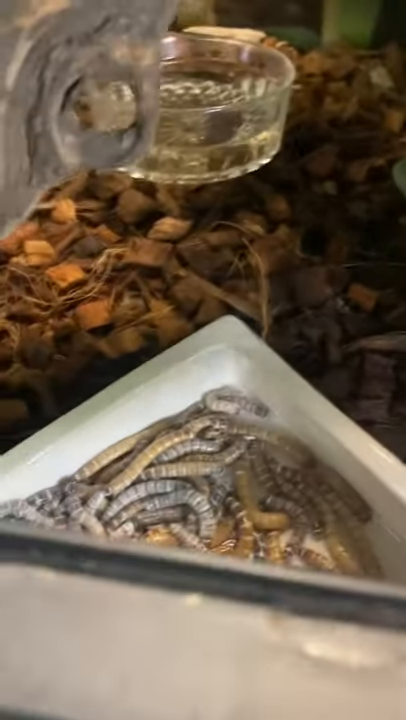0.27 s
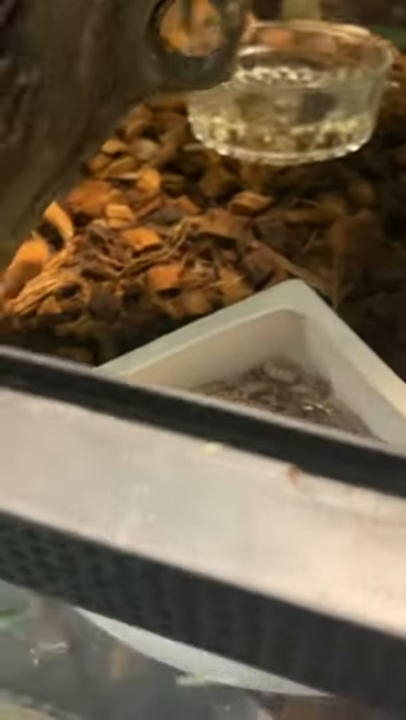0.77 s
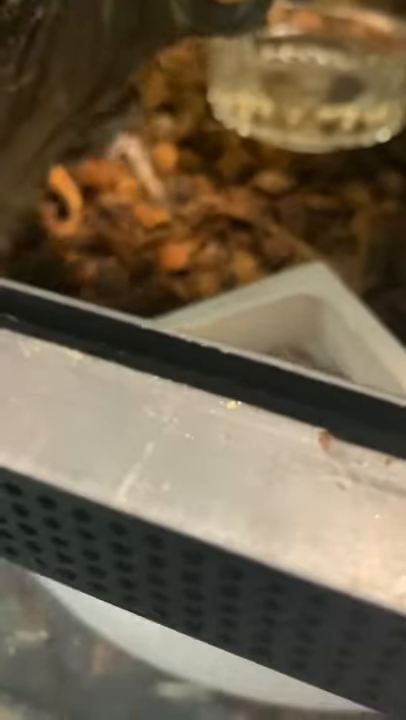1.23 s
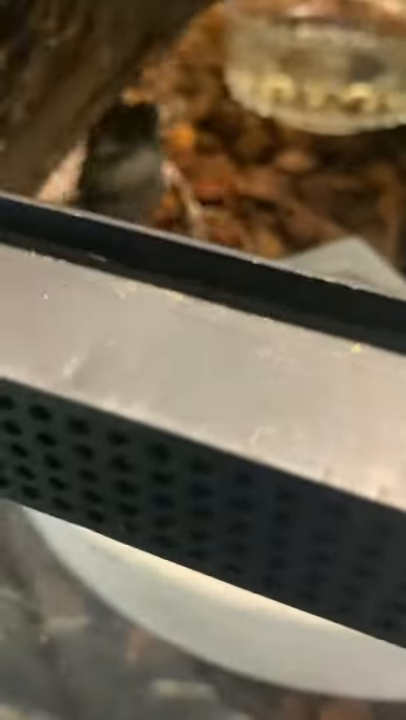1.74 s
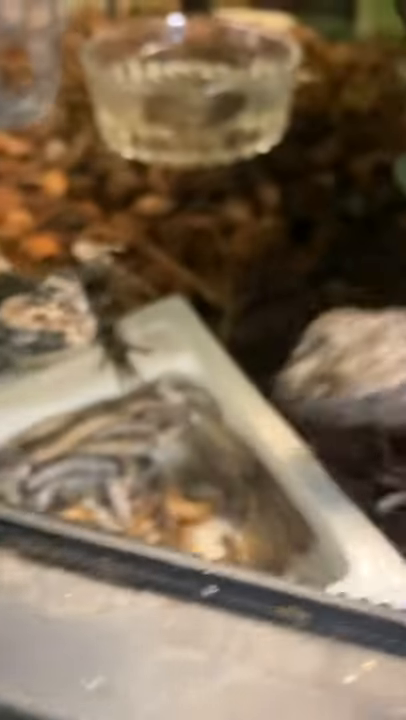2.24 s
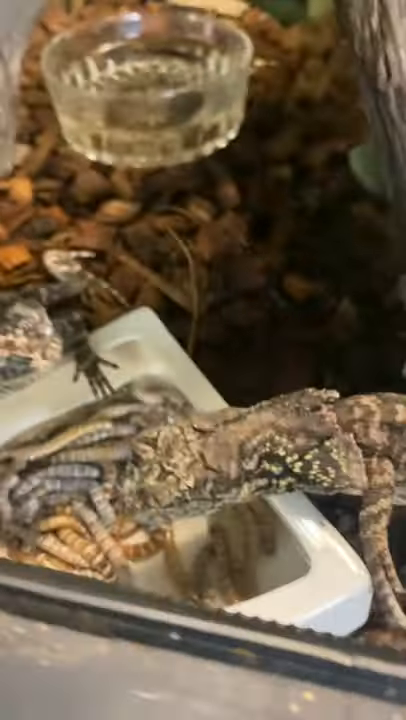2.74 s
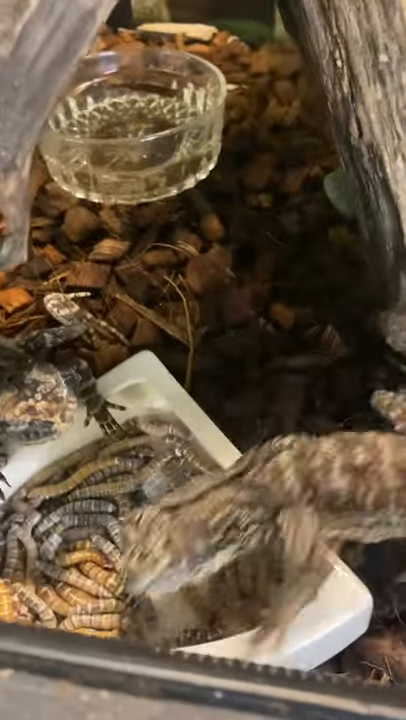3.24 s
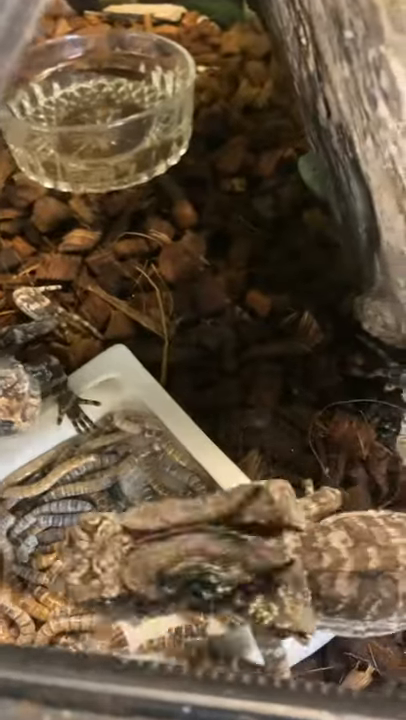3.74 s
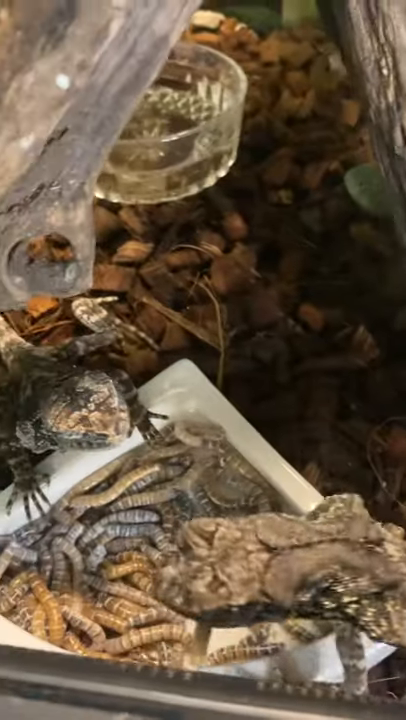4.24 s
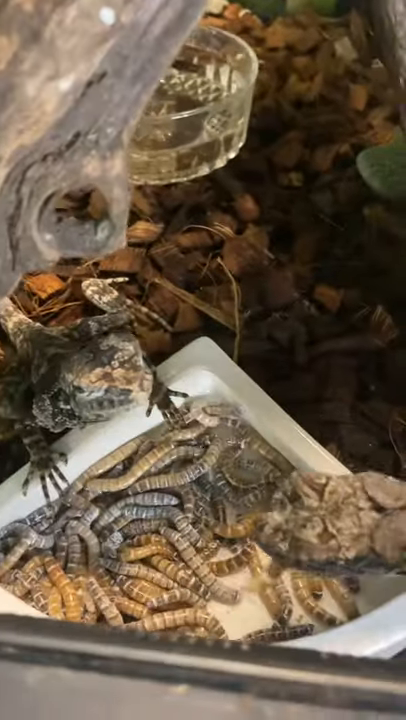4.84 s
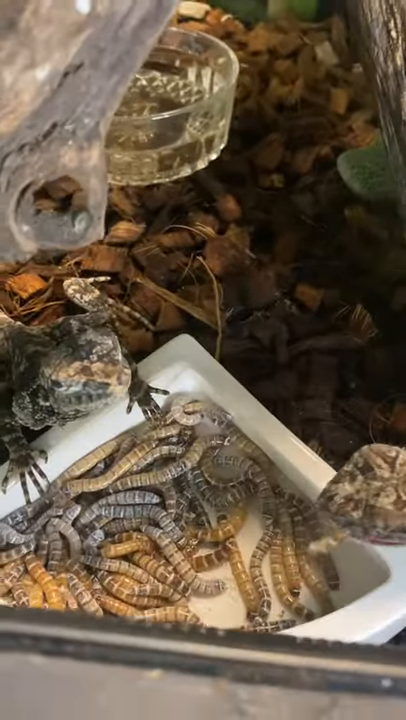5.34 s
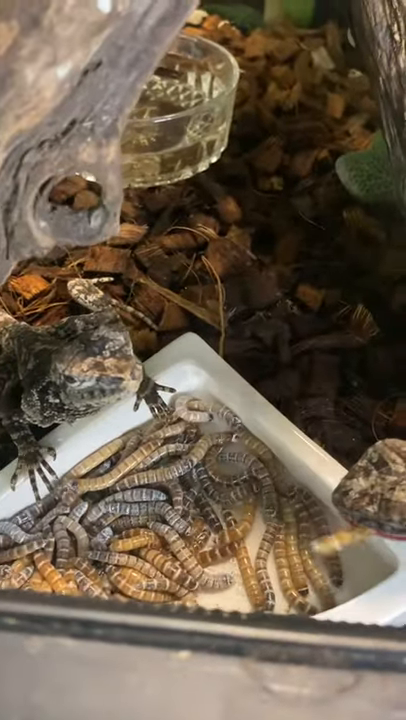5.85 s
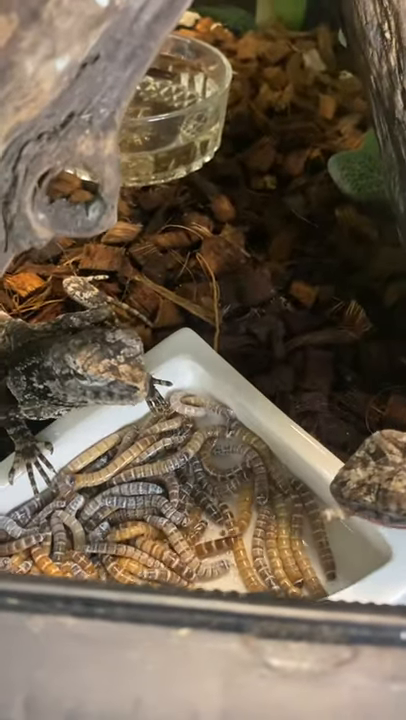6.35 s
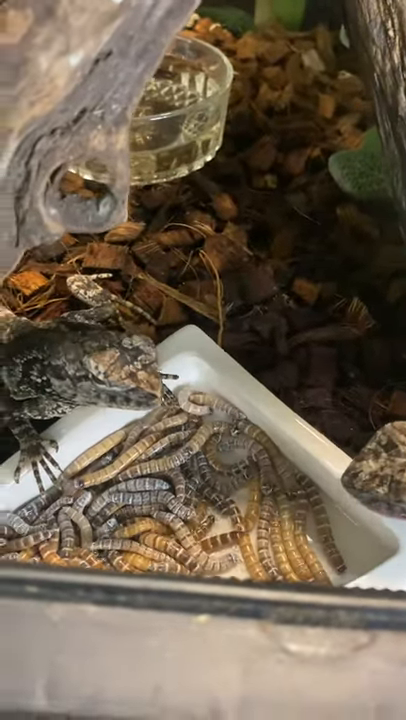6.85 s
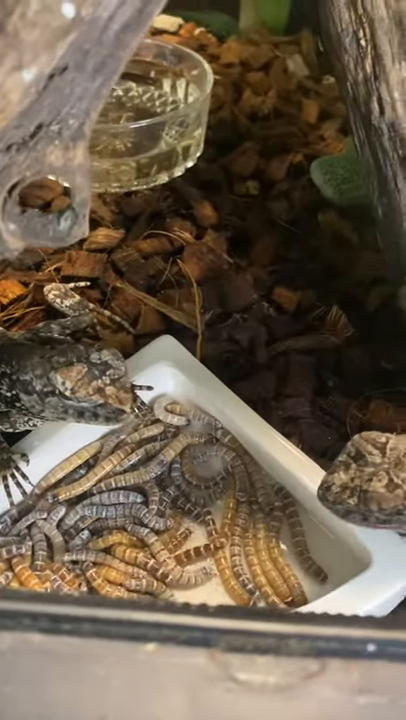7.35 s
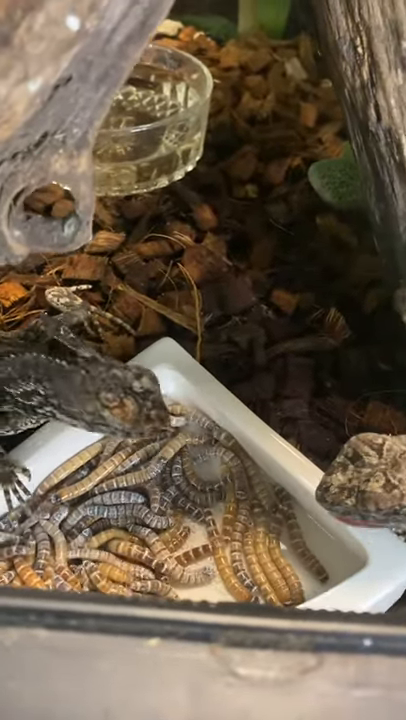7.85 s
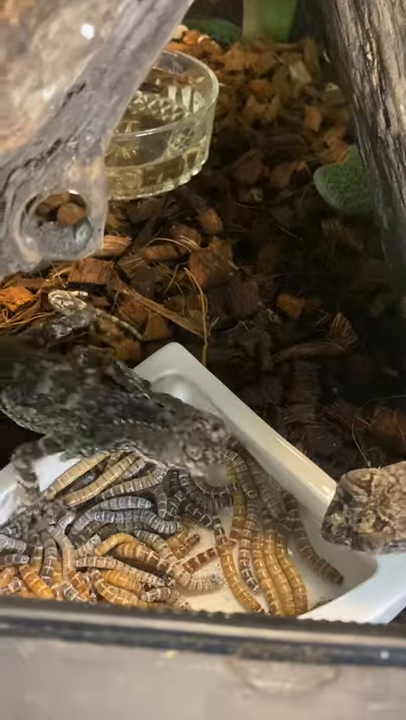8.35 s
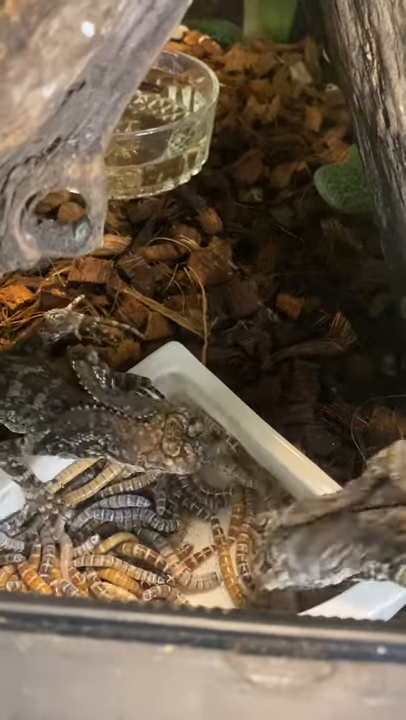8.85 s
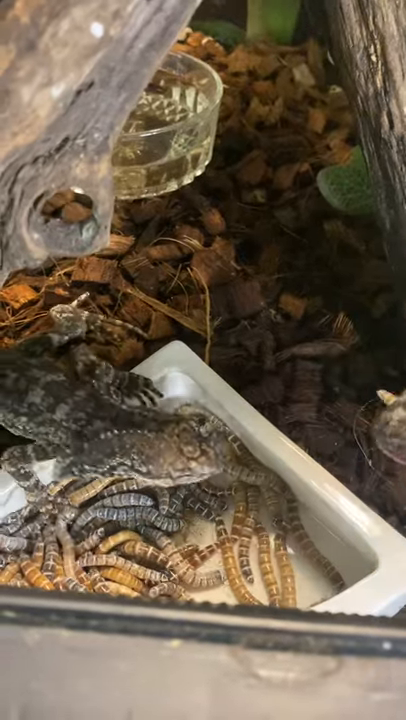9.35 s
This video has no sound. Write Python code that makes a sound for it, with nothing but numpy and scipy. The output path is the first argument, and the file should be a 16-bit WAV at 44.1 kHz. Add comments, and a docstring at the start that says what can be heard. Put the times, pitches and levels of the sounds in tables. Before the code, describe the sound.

A steady low motor hum and indoor room rumble run throughout. In the first quarter second a terrarium door gives a cluster of dull bumps, the loudest sound, with clicks and close rubbing of hands. One sharp knock comes at about 0.8 seconds, and softer bumps near 1.3 and 2.5. A faint low mechanical groan sounds from 1.5 to 2.1 seconds. The handling rustle and rumble fade by about 4 seconds, while small claws scratch and tap on bark chips and a dish. Lizards bite worms with quiet, crisp clicks and crunches, thickest between 3.5 and 4.9 seconds, ending in a high snap. Further short crunches come near 5.9, 6.3, 7.1, 8, 8.9, 9.2 and 9.5 seconds, with tiny ticks of crawling worms between. From about 4 seconds a very faint distant insect trill pulses, and a barely audible thin whine comes and goes.

```python
"""In a glass tank, small lizards snap up worms from a dish. Cracking shells and tapping claws excite
damped resonances; hands, feet and worms rustle by stick-slip friction among bark chips. Early on a door
bumps in low modes and a brief groan sounds. Later a far insect trill throbs as modulated narrow-band
noise and a thin whine comes and goes. A motor and mains gear hum steadily over the rumble of the room."""
import sys
import numpy as np
from scipy import signal
from scipy.fft import rfft, irfft, next_fast_len
from scipy.io import wavfile
from scipy.ndimage import uniform_filter1d

SR = 44100
rng = np.random.default_rng(int(sys.argv[2]) if len(sys.argv) > 2 else 0)


def output_pcm(signal):
    """Save a mono or channel-first signal as 16-bit PCM at the path in sys.argv[1].

    Samples are clipped to [-1, 1] before scaling.
    """
    pcm = np.clip(np.atleast_2d(signal).T, -1, 1) * 32767
    wavfile.write(sys.argv[1], SR, np.round(pcm).astype(np.int16))


N = 423801
T = np.arange(N) / SR
FFT_SIZE = next_fast_len(N)
BIN_HZ = np.arange(FFT_SIZE // 2 + 1) * SR / FFT_SIZE
RISE_S = .0007  # build-up of an impact
UNSHARED = .5  # amplitude of each microphone port's own noise against the shared noise


def undb(db):
    """Amplitude ratio of a level in decibels."""
    return 10 ** (np.asarray(db) / 20)


def decay(t, t60):
    """Exponential damping: unity until t = 0, then 60 dB down every t60 seconds."""
    return np.exp(-np.log(1000) * np.maximum(t, 0) / t60)


def curve(table, column=1):
    """Linear interpolation of a level over time, silent outside the table."""
    rows = np.array(table)
    return np.interp(T, rows[:, 0], rows[:, column], left=-150, right=-150)


def along(table, hz):
    """Interpolation on a logarithmic frequency axis."""
    rows = np.array(table, float)
    return np.interp(np.log(hz + 1), np.log(rows[:, 0]), rows[:, 1])


def colour(x, table):
    """Spectral shaping, normalised to unit rms."""
    shaped = rfft(x, FFT_SIZE) * undb(along(table, BIN_HZ)) * (BIN_HZ < table[-1][0])
    y = irfft(shaped, FFT_SIZE)[..., :N]
    return y / np.sqrt(np.mean(y ** 2))


def waver(rate):
    """Smooth random modulation of unit deviation, with rate new values a second."""
    hold = int(SR / rate)
    steps = np.repeat(rng.standard_normal(N // hold + 1), hold)
    smooth = uniform_filter1d(uniform_filter1d(steps, hold), hold)[:N]
    return smooth / smooth.std()


def ring(x, hz, width):
    """Resonance as a fourth-order band-pass, width in Hz."""
    edges = np.clip([hz - width / 2, hz + width / 2], 50, SR / 2 - 100)
    return signal.sosfilt(signal.butter(2, edges, "bandpass", fs=SR, output="sos"), x)


def add(out, start, piece):
    """Superposition of a mono or stereo piece on both channels."""
    i = int(start * SR)
    out[:, i:i + piece.shape[-1]] += piece[..., :N - i]


def impact(t60, tail_db, splinter_db=-60):
    """Impulsive excitation: a noise burst, two splinters and a reverberant tail from the glass walls."""
    t = np.arange(3000) / SR
    delays, weakness = rng.random((2, 2))
    envelope = decay(t, t60) + undb(tail_db) * np.exp(-t / .016)
    for delay, db in zip(.003 + .011 * delays, splinter_db - 12 * weakness):
        envelope += undb(db) * (t >= delay) * decay(t - delay, t60)
    noise = rng.standard_normal((3, len(t)))
    return np.minimum(t / RISE_S, 1) * envelope * (noise[0] + UNSHARED * noise[1:])


# Likeness of far sound at the two ports (frequency [Hz], correlation [-1 to 1])
COHERENCE = [(30, .999), (150, .995), (300, .96), (600, -.1), (1200, .35), (3000, .5), (5500, .75),
             (12000, .8)]
def far_noise():
    """Spatial coherence: white noise at two ports, nearly identical at long wavelengths."""
    alike = along(COHERENCE, BIN_HZ)
    mid, side = rfft(rng.standard_normal((2, FFT_SIZE)))
    mid, side = mid * np.sqrt(1 + alike), side * np.sqrt(1 - alike)
    return irfft([mid + side, mid - side], FFT_SIZE)[:, :N]


# Room noise spectrum (frequency [Hz], relative level [dB])
ROOM = [(20, -26.5), (40, -24.5), (58, -1), (95, -10.5), (130, -1.5), (155, -9.5), (185, -21.5),
        (260, -19.5), (290, -27), (335, -20), (400, -30.5), (470, -32), (560, -39), (730, -34.5),
        (860, -42), (1010, -40), (1500, -48.5), (2000, -46), (2800, -58), (4500, -62), (6300, -44.5),
        (7000, -71)]
def room():
    """Stationary background noise, its energy concentrated in the bass."""
    return colour(far_noise(), ROOM) * undb(-44.5)


# Motor and mains tones (frequency [Hz], level [dB], level deviation [dB])
HUM = [(59.13, -49, 2.), (77.07, -37.2, .6), (119.97, -52, 2.5), (239.95, -57, 2.6), (359.92, -72, 2.5),
       (479.91, -76, 3.), (959.83, -81.5, 2.), (1017, -84, 1.5)]
def hum():
    """Periodic vibration of a motor and mains gear gives a line spectrum; each line wavers in level."""
    phases = rng.random(len(HUM)) * 2 * np.pi
    return sum(np.sqrt(2) * undb(db + wobble * waver(6)) * np.sin(2 * np.pi * hz * T + phase)
               for (hz, db, wobble), phase in zip(HUM, phases))


def bark_chips(grains_per_s=16, scatter_db=2, q=17):
    """A Poisson process in each narrow band: loose chips scrape briefly at random instants."""
    out = 0
    for hz in 900 * 2 ** np.arange(0, 2.9, .1):
        chance, size = rng.random((2, N))
        hits = (chance < grains_per_s / SR) * undb(-scatter_db * np.log(size + 1e-9))
        noise = rng.standard_normal((3, N))
        scrape = uniform_filter1d(hits, size=600) * (noise[0] + UNSHARED * noise[1:])
        out = out + ring(scrape, hz, hz / q)
    return out


# Continuous rubbing (time [s], level [dB], relative treble [dB])
RUB = [(0.0, -65.5, -10), (0.3, -54, -7), (0.75, -56, -4), (1.1, -58.5, -3.5), (1.33, -65.5, -5),
       (1.6, -65.5, -5.5), (1.92, -59.5, -5.5), (2.2, -67.5, -9), (2.5, -63.5, -8), (2.93, -67, -8.5),
       (3.06, -69, -15), (3.3, -61.5, -7), (3.55, -76.5, -5), (3.75, -66.5, -7), (4.05, -77.5, 0),
       (4.7, -78.5, 2), (5.1, -86, 13.5), (5.36, -91, 5), (7.0, -82, -0.5), (7.4, -90.5, -1),
       (7.8, -81, -2.5), (8.7, -82.5, 1), (9.61, -78.5, 1)]
# Separate rustles (start [s], hold [s], level [dB], relative treble [dB])
RUSTLES = [(0.058, 0.094, -47, -6.5), (0.186, .03, -49.5, -8), (0.39, 0.085, -53, -5),
           (0.512, 0.058, -49, -7), (0.67, 0.024, -55.5, -10), (.82, 0.054, -56, -18),
           (0.933, 0.045, -53.5, -3.5), (1.147, 0.11, -60, -4.5), (1.407, 0.018, -69, -4),
           (1.656, 0.143, -60, -5.5), (1.952, 0.063, -54.5, -4), (2.006, 0.078, -47.5, -6),
           (2.089, 0.053, -56.5, -1), (2.356, 0.05, -62.5, 0.5), (2.578, 0.031, -61, -25),
           (2.685, 0.026, -63.5, -4), (2.814, .06, -67, -3), (3.117, 0.13, -71, -1),
           (3.248, 0.17, -65.5, -10), (3.568, 0.024, -67, -1), (3.765, 0.041, -65.5, -5),
           (3.957, 0.017, -70, -7), (4.08, 0.044, -72, 3), (4.34, 0.057, -69.5, -2), (5.411, 0.032, -69, 2),
           (5.54, 0.0079, -77, 6.5), (7.185, .02, -79.5, 7), (7.658, 0.052, -73.5, -3), (6.25, .05, -74, 1),
           (8.356, 0.214, -80, 5.5), (9.379, 0.12, -73, 3.5)]
# Midrange and treble friction filters (frequency [Hz], relative gain [dB])
RUB_MID = [(400, -40), (700, 0), (1200, -4), (1700, -1), (2500, 0.5), (4000, -2.5), (5200, -4), (6400, 0.5),
           (7000, -4.5)]
RUB_TOP = [(7800, -25), (8600, -3), (10500, -2), (12300, 3.5), (13000, -17.5), (14200, -7), (15000, -3.5),
           (15800, -33), (16400, -44.5)]
def rubbing(attack_s=.017, release_s=.038):
    """Stick-slip friction of hands, feet and worms: grainy noise, tinted by patches of surface."""
    rough = far_noise() * undb(2.8 * waver(250) + .6 * waver(45))
    patches = sum((-1) ** k * ring(rough, hz, .27 * hz) * undb(2.8 * waver(55))
                  for k, hz in enumerate(650 * 2 ** np.arange(0, 3.5, .39)))
    level = undb(curve(RUB))
    treble = level * undb(curve(RUB, column=2))
    for start, hold, db, treble_db in RUSTLES:
        rise = (T - start) / attack_s
        fall = 1 + (start + attack_s + hold - T) / release_s
        swell = undb(db) * np.clip(np.minimum(rise, fall), 0, 1) ** 2
        level = np.hypot(level, swell)  # incoherent sounds add in power
        treble = np.hypot(treble, swell * undb(treble_db))
    mid = colour(patches, RUB_MID) + undb(-3.5) * colour(bark_chips(), RUB_MID)
    top = colour(rough * undb(1.5 * waver(13)), RUB_TOP)  # the treble flickers on its own
    return mid * level * undb(-2.5) + top * treble


# Hand rumble envelope (time [s], level [dB])
RUMBLE = [(0.0, -46.5), (1.3, -44.5), (3.1, -48.5), (4.2, -63.5)]
# Its spectrum (frequency [Hz], relative level [dB])
RUMBLE_SPECTRUM = [(70, -5.5), (110, 4), (180, -6.5), (250, -2), (300, -10), (380, -10), (500, -20.5),
                   (800, -22.5)]
def hand_rumble():
    """Low-frequency friction noise of hands, randomly modulated in amplitude."""
    return colour(far_noise() * undb(1.8 * waver(12)), RUMBLE_SPECTRUM) * undb(curve(RUMBLE))


# Hollow taps and one high snap (time [s], peak level [dB], frequency [Hz], excitation T60 [s])
TAPS = [(0.0737, -58, 2000, 0.033), (0.159, -29.5, 1730, 0.013), (0.2033, -36, 1760, 0.038),
        (1.6711, -37.5, 1910, 0.022), (1.731, -36.5, 930, 0.055), (2.223, -37.5, 2320, 0.03),
        (2.374, -47.5, 1220, 0.033), (2.5606, -45.5, 764, 0.033), (3.361, -47, 2300, 0.03),
        (3.4184, -51, 915, 0.044), (4.135, -49.5, 2050, 0.033), (4.4533, -49, 1200, 0.02),
        (4.4742, -52, 1280, 0.03), (4.518, -40, 1060, 0.024), (4.822, -56, 1090, 0.029),
        (4.834, -22, 15000, .016), (5.8735, -52, 2400, 0.03), (6.979, -53.5, 1830, 0.021),
        (.2024, -35, 3600, .02), (4.834, -52, 1010, .02), (2.318, -47.5, 1930, 0.023),
        (2.339, -45, 4000, .012), (2.704, -48, 2700, .025), (4.742, -51, 700, .025), (4.743, -48, 403, .03),
        (5.14, -50, 380, .03), (0.413, -39, 5100, .025), (1.155, -45.5, 2900, 0.028),
        (9.189, -50, 1910, 0.02)]
def taps():
    """Impact excitation: each tap on dish, bark or frame rings one broad resonance."""
    out = np.zeros((2, N))
    for start, db, hz, t60 in TAPS:
        tap = ring(impact(t60, tail_db=-38), hz, .31 * hz)
        add(out, start - RISE_S, tap / np.abs(tap).max() * undb(db))
    return out


# Shell modes: main, dull, bright, top, edge (frequency [Hz], bandwidth [Hz])
SHELL_MODES = [(5300, 720), (3167, 2520), (10700, 3400), (14900, 1300), (6300, 800)]
# Cracks and claw ticks (time [s], excitation level [dB], dull gain [dB], bright gain [dB])
CRACKS = [(.0746, -27, 0, -3), (.1597, -41.5, 14, -2), (.2034, -52, 22, -14), (.2224, -38, -22, -18),
          (.4119, -38.5, 3.5, 4), (.8187, -20.5, -9, -12), (1.1806, -56, -4, 13), (1.6701, -40.5, -2, -1),
          (1.7323, -52.5, 17, 1), (1.9896, -35.5, -7, -4), (1.9335, -50, -8, -5), (2.1301, -39, -14, -8),
          (2.2242, -51.5, 13.5, 12), (2.3617, -37, -7, -8), (2.5124, -46, -5, -20), (2.6057, -50, -10, -15),
          (3.2545, -52.5, 6.5, -8), (3.3619, -57, 18.5, 12), (3.4184, -52.5, 10.5, 0),
          (3.544, -48, -16, -10), (3.5675, -50.5, 9.5, 2), (3.573, -45.5, 2, -8), (3.5796, -40, -5, -11),
          (3.591, -51, -4, -6), (3.801, -45, -15, 3), (3.8259, -41, -18, -5), (3.8387, -43.5, -1.5, -1),
          (4.1009, -39.5, -9, 3.5), (4.1089, -40.5, -17, -3), (4.1351, -45.5, -9, 4),
          (4.1432, -43.5, -1, 2), (4.1603, -39, -14, -8), (4.362, -49, -6, -3), (4.4358, -44, -14, -1),
          (4.4418, -44, -10, -4), (4.4524, -35, -12, -5), (4.4705, -42, -4, 3.5), (4.475, -44, -8, -8),
          (4.4851, -37, -12, -11), (4.4922, -35.5, -12, -8), (4.5019, -36, -11, -16),
          (4.5097, -28.5, -11, -12), (4.5177, -31.5, -5.5, -6.5), (4.789, -54, -4, 7),
          (4.8037, -42, -15, 2), (4.8218, -43, -8, 4), (4.8337, -33, -12.5, -1), (4.8439, -28.5, -16, -1),
          (4.8612, -43, -6, 5), (4.869, -44, -9, 1), (4.884, -51, -10, -2), (5.8478, -50.5, -4, 9),
          (5.8742, -28.5, -9.5, -5.5), (5.8922, -39, 0, 1), (5.9796, -64, -6, 5), (6.1422, -58, -8, 7),
          (6.315, -38, -16, -7), (6.3225, -30.5, -11.5, -5.5), (6.3324, -39, 1.5, -3), (6.275, -56, 0, 2),
          (6.4006, -59, -5, 7), (7.062, -60, -3, 4), (7.0714, -41.5, -11, -4), (7.0784, -34.5, -9.5, -1.5),
          (7.1075, -55, -8, -3), (7.1282, -32, -11.5, -5), (7.1403, -29, -9.5, -9), (7.146, -45, 2, -6),
          (7.819, -47.5, -18, -2.5), (7.9391, -49, -5, -1), (7.9569, -31.5, -7.5, -9.5),
          (8.4733, -60, 9, 4), (8.8993, -45, -9, 1), (8.9089, -42.5, -2.5, 3.5), (8.9165, -43, -11, -10),
          (8.9233, -45, -15, 2), (9.1895, -42.5, -6, 2), (9.213, -41.5, -5, 8.5), (9.5346, -43.5, -5.5, 6),
          (9.5465, -47, -20, 1)]
def shell_cracks(detune=.03, edge_db=-3):
    """Brittle fracture excites shell and jaw modes; crawling worms add faint ticks at random."""
    worm_ticks = [(1.2 + 8.4 * when, -79 + 11 * force, -4, 2 + 9 * (tint - force))
                  for when, force, tint in rng.random((60, 3))]
    out = np.zeros((2, N))
    for start, db, dull_db, bright_db in list(CRACKS) + worm_ticks:
        blow = undb(db) * impact(t60=.011, tail_db=-25, splinter_db=-14)
        top_db = bright_db - 6 + .6 * max(db + 37, 0)  # stronger in the loudest cracks
        gains = undb([0, dull_db, bright_db, top_db, edge_db])
        tunings = 1 + detune * np.clip(rng.standard_normal(len(SHELL_MODES)), -2, 2)
        # the root makes up for a narrow mode's smaller share of a broad blow
        shell = sum(gain * ring(blow, hz * tuning, width) * np.sqrt(8000 / width)
                    for gain, tuning, (hz, width) in zip(gains, tunings, SHELL_MODES))
        jaw = ring(blow, hz=1690, width=2200) * undb(dull_db + 2)
        add(out, start - RISE_S, shell + jaw)
    return out


# Claw strokes (start [s], duration [s], frequency [Hz], bandwidth [Hz], level [dB])
SCRATCHES = [(2.725, 0.21, 2120, 295, -69.5), (2.727, 0.22, 2770, 400, -67), (2.792, 0.13, 10000, 690, -69),
             (3.048, 0.46, 985, 400, -65.5), (3.103, 0.16, 10140, 700, -69),
             (3.311, 0.045, 3250, 1500, -57.5), (3.672, 0.092, 3160, 900, -69.5),
             (3.737, 0.07, 3500, 1300, -62.5), (3.85, 0.024, 3570, 900, -57.5),
             (3.86, 0.048, 3460, 1300, -68), (3.945, 0.018, 3420, 1300, -62),
             (3.962, 0.06, 3460, 1290, -61.5), (6.029, 0.2, 4260, 900, -78.5), (4.4, 0.023, 8900, 700, -67),
             (4.79, 0.041, 2000, 500, -63), (6.449, .025, 1300, 350, -67.5), (0.077, 0.086, 5370, 300, -54),
             (.08, .09, 2760, 300, -56), (0.204, 0.052, 4870, 600, -55), (2.058, 0.041, 3900, 500, -55),
             (2.142, 0.025, 3500, 500, -56), (2.02, .03, 4400, 600, -55), (2.025, .035, 1700, 500, -55),
             (2.591, 0.029, 4900, 450, -58), (0.579, 0.039, 1360, 300, -56), (0.469, 0.052, 2190, 500, -58),
             (.525, .04, 5270, 500, -55.5), (0.943, 0.06, 5140, 900, -54), (3.578, 0.038, 3500, 500, -62),
             (6.264, 0.055, 5030, 1500, -65)]
def claw_scratches():
    """Sliding friction drives one resonance with rough noise that swells and fades."""
    out = np.zeros((2, N))
    for start, duration, hz, width, db in SCRATCHES:
        size = int(duration * SR)
        noise = rng.standard_normal((3, SR // 2))[:, :size]
        rough = (noise[0] + .7 * noise[1:]) * undb(4 * waver(150)[:size])
        band = ring(ring(rough, hz, width), hz, width)
        add(out, start, band / band.std() * undb(db) * signal.windows.tukey(size, .6))
    return out


# Dull door bumps (time [s], peak level [dB], frequency [Hz], rise [s], T60 [s])
BUMPS = [(0.1202, -16.5, 98, 0.011, 0.14), (0.1552, -9.5, 88, 0.015, 0.061),
         (.158, -21.5, 178, 0.001, 0.033), (0.205, -14.5, 71, 0.0077, 0.04),
         (0.234, -23, 57.2, 0.0059, 0.56), (0.851, -42, 326, 0.0012, 0.13), (.852, -27, 128, 0.004, 0.071),
         (1.259, -30.5, 130.4, 0.018, 0.22), (2.451, -36, 99.5, 0.06, 0.17)]
def door_bumps():
    """Structure-borne sound through frame and hand: a low mode swells under a soft push, then decays."""
    out, t = np.zeros((2, N)), np.arange(SR // 2) / SR
    for start, db, hz, rise, t60 in BUMPS:
        envelope = np.sin(np.pi / 2 * np.minimum(t / rise, 1)) ** 2 * decay(t - rise, t60)
        add(out, start, undb(db) * envelope * np.sin(2 * np.pi * hz * t))
    return out


# Modes of the metal frame, dish and glass (frequency [Hz], peak level [dB], T60 [s])
FRAME = [(3080, -33.5, 0.04), (3470, -36, 0.027), (3620, -34, 0.029), (4600, -37, 0.027),
         (4910, -30, 0.022), (5140, -30.5, .018)]
DISH = [(2136, -45, 0.067), (2540, -41, 0.053)]
GLASS = [(9930, -51.5, .06), (11600, -54, 0.089)]
# Hard knocks (time [s], modes struck [table])
KNOCKS = [(.8188, FRAME), (3.3603, DISH), (8.4725, GLASS)]
def knocks():
    """Free vibration: a struck body rings as a sum of damped sinusoids."""
    out, t = np.zeros((2, N)), np.arange(SR // 5) / SR
    for start, modes in KNOCKS:
        for hz, db, t60 in modes:
            add(out, start, undb(db) * decay(t, t60) * np.sin(2 * np.pi * hz * t))
    return out


# Groan envelope (time [s], level [dB])
GROAN = [(1.45, -72), (1.62, -55), (1.85, -53), (2.05, -54), (2.17, -75)]
# Its partials (harmonic number [-], relative level [dB])
GROAN_HARMONICS = [(2, -12), (3, -6.5), (4, 0), (6, -6), (7, -13.5), (9, -18.5)]
def groan(fundamental_hz=64.6):
    """A harmonic series on a missing fundamental, drifting slightly in pitch."""
    phase = 2 * np.pi * fundamental_hz * np.cumsum(1 + .0017 * waver(5.02)) / SR
    tone = sum(undb(db) * np.sin(k * phase + k * k) for k, db in GROAN_HARMONICS)
    return np.sqrt(2) * undb(curve(GROAN)) * tone


# Trill strength at the crests (time [s], level [dB])
TRILL = [(3.27, -94), (3.83, -71.5), (5.151, -74.5), (5.73, -68), (7.021, -74.5), (7.73, -70), (8.63, -63),
         (9.18, -71), (9.38, -76), (9.61, -70)]
# Pace of its throbs (time [s], running count [-])
THROBS = [(3.27, 0), (3.83, 3), (5.15, 10), (5.73, 13), (7.02, 20), (7.73, 24), (8.23, 27), (8.63, 29),
          (9.2, 32), (9.69, 35)]
def insect_trill(hz=5880, width=680, throb_s=.044, scatter_db=1.5):
    """Amplitude modulation: a far narrow-band chirr throbs about five times a second over a faint floor."""
    chirr = far_noise() * undb(2 * waver(150) + 2 * waver(35))
    band = ring(ring(chirr, hz, width), hz, width)
    times, counts = np.array(THROBS).T
    nearest = np.round(np.interp(T, times, counts)).astype(int)
    crest_s = np.interp(nearest, counts, times)
    crest_db = np.interp(crest_s, *np.array(TRILL).T)
    crest_db += scatter_db * rng.standard_normal(nearest.max() + 1)[nearest]
    throb = undb(crest_db) * np.exp(-((T - crest_s) / throb_s) ** 2)
    return band / band.std() * (throb + undb(-89))


# Whine envelope (time [s], level [dB])
WHINE = [(4.2, -95), (4.28, -82), (4.5, -86), (4.67, -81), (4.8, -89), (5.03, -74), (5.22, -93),
         (5.3, -100), (8.4, -100), (8.6, -86), (9.1, -82), (9.3, -100)]
def whine(hz=1698):
    """A faint pure tone under a slow amplitude envelope."""
    return np.sqrt(2) * undb(curve(WHINE)) * np.sin(2 * np.pi * hz * T)


# Lag of the right port behind the left (frequency [Hz], phase [rad])
PORT_LAG = [(100, .03), (2000, .15), (2580, 1.3), (5340, .5), (6890, 3.1), (9730, 6.2), (12600, 9.3),
            (16000, 12.4)]
def scene():
    """Linear superposition of all sources at two ports that differ in phase and gain."""
    left, right = (room() + hum() + rubbing() + hand_rumble() + taps() + shell_cracks()
                   + claw_scratches() + door_bumps() + knocks() + groan() + insect_trill() + whine())
    size = next_fast_len(N + 64)
    hz = np.arange(size // 2 + 1) * SR / size
    lagged = irfft(rfft(right, size) * np.exp(-1j * along(PORT_LAG, hz)), size)[:N]
    return np.array([left * undb(.13), lagged * undb(.61)])


def record(dry, bass_hz=42, notch_hz=7550, top_hz=17000):
    """Frequency response of a phone microphone: bass roll-off, a treble notch and a steep upper cutoff."""
    thin = signal.sosfilt(signal.butter(2, bass_hz, "highpass", fs=SR, output="sos"), dry)
    notch_db = -11 * np.exp(-((BIN_HZ - notch_hz) / 480) ** 4)
    notched = irfft(rfft(thin, FFT_SIZE) * undb(notch_db), FFT_SIZE)[:, :N]
    return signal.sosfilt(signal.ellip(10, .2, 80, top_hz, fs=SR, output="sos"), notched)


dry = scene()
out = record(dry)
output_pcm(out)
```